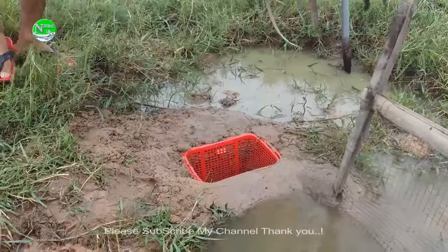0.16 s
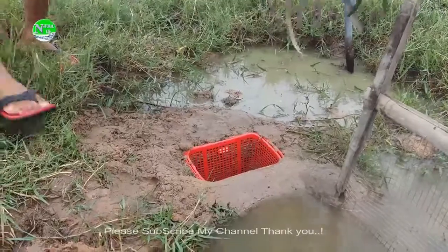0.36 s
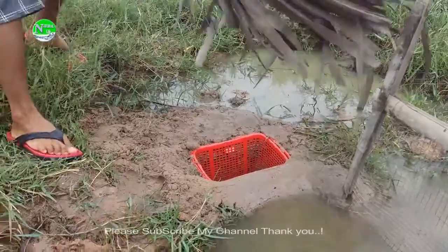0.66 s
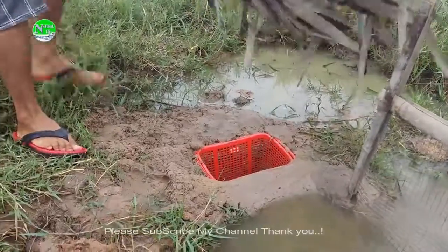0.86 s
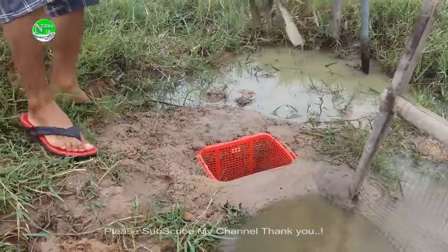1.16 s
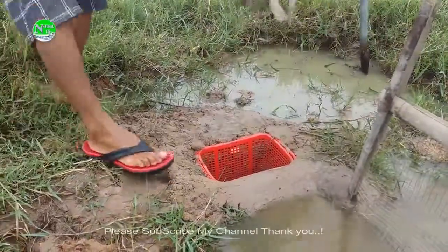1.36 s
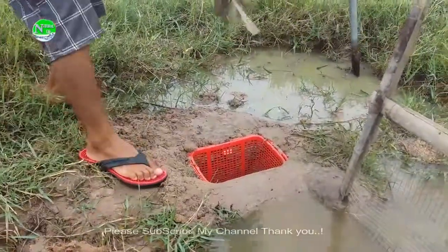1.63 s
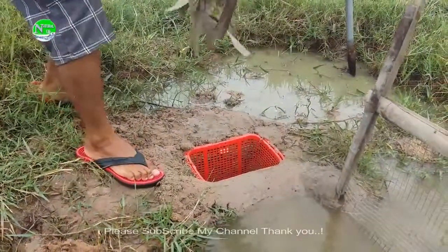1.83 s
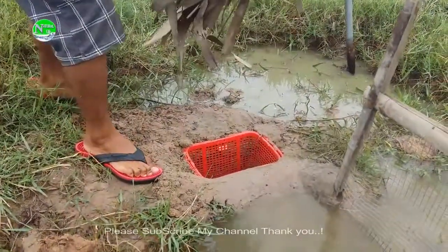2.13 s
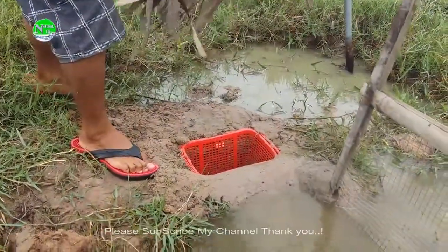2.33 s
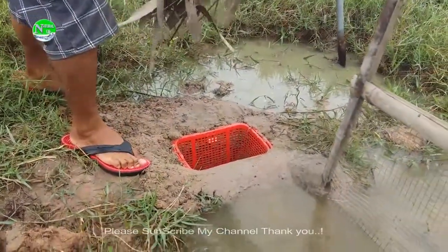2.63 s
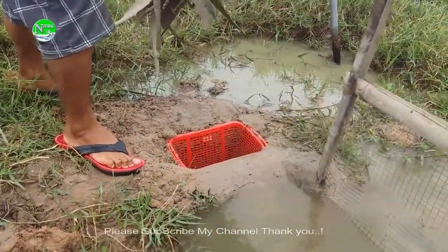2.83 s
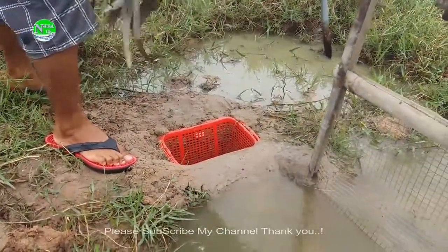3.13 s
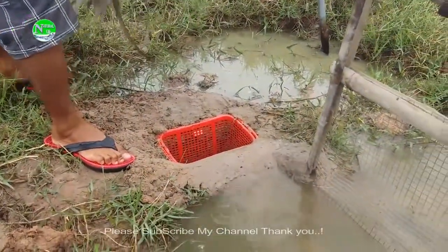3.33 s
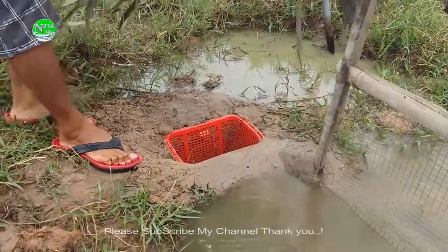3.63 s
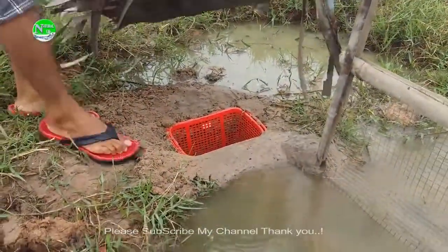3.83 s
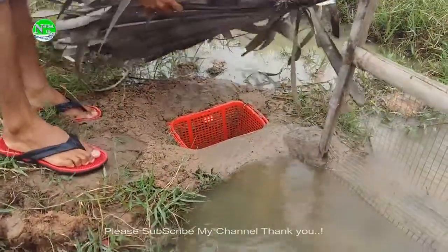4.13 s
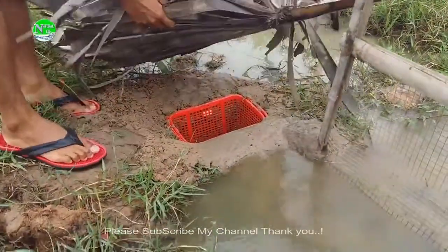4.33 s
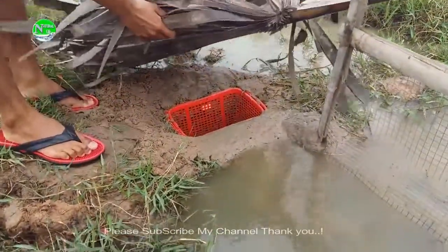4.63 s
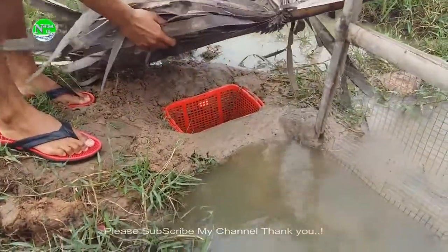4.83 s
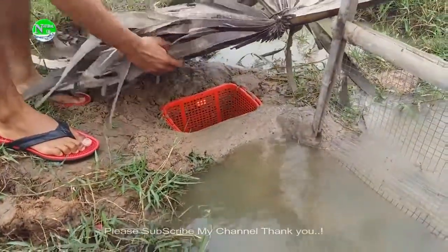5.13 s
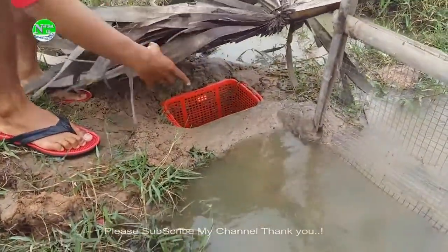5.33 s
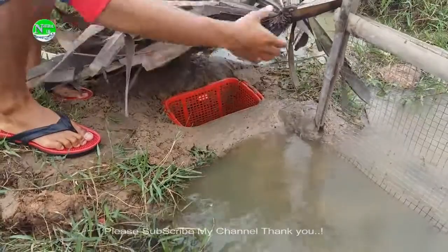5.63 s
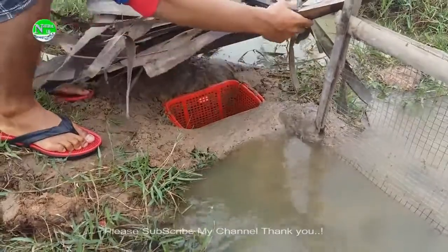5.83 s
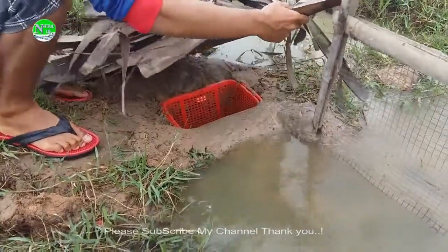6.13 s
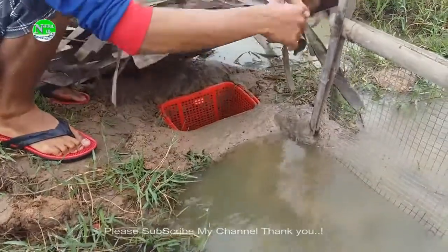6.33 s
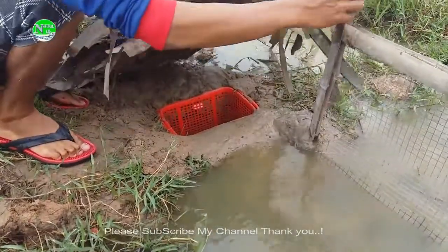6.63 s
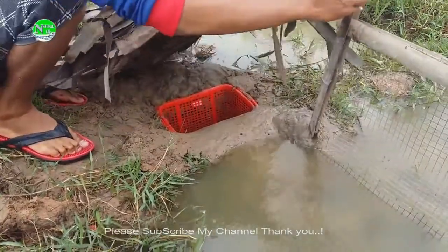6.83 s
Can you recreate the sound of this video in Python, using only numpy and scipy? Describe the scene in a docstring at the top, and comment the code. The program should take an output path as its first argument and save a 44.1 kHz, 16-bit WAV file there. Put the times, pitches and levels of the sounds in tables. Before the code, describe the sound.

A bundle of dead, papery fronds is shaken and set down in open air. It starts with fine crackle and short dragging swishes, builds to loud bright snaps and tearing ribs, and pauses briefly around three seconds before another burst just before four. Then sparser rubbing and isolated cracks remain, with tiny high bird chips and barely audible far buzzes. Close small stereo microphone, bright around six kilohertz, over a faint distant rumble.

```python
"""Dry palm fronds are carried in, shaken and laid down beside a ditch, over low distant rumble.
From the start blades rub (slips ringing modes) and ribs snap (micro-crack flurries, thickest from 2 to 4 s).
A stalk creaks near 1.9 s (noise on three modes); a far bird buzzes from 2.6 s (noise bands).
A small grass bird chips from 4.2 s (gliding sines). Rubbing thins out toward the end.
Two microphone ports a hand apart; crackle and snaps are brightest near 6 kHz, where the ports ring unevenly."""
import sys
import numpy as np
from scipy import signal
from scipy.fft import rfft, irfft
from scipy.io import wavfile

SR = 44100
rng = np.random.default_rng(int(sys.argv[2]) if len(sys.argv) > 2 else 0)


def generate_wav(signal):
    """Clip the signal to [-1, 1] and save it as 16-bit WAV at the path in sys.argv[1]."""
    frames = np.transpose(np.atleast_2d(signal))
    scaled = np.clip(frames, -1, 1) * 32767
    pcm = np.round(scaled).astype(np.int16)
    wavfile.write(sys.argv[1], SR, pcm)


N = 306936

# Slow busyness of the bundle: time_s, crackle_db, swish_re_crackle_db, brittle_re_crackle_db
HANDLING = [(0, -49, -4, -17), (0.34, -53, -1, -14), (0.401, -40.5, -1.5, -21), (0.68, -42.5, 1.5, -20.5),
            (0.74, -46, -5.5, -16.5), (1.14, -43, -2, -17), (1.343, -48.5, -7, -22), (1.363, -38.5, 1, -14),
            (1.75, -42.5, -3.5, -24), (2.0, -37.5, -10.5, -19), (2.58, -39.5, -6.5, -17),
            (2.68, -53.5, -0.5, -18), (2.97, -45.5, -3.5, -21), (3.45, -42, -4, -21.5), (4.0, -40, -6, -15),
            (4.45, -49.5, -4.5, -20.5), (5.2, -49, -1.5, -20), (5.85, -54.5, -3, -21.5),
            (6.96, -54, 0, -19.5)]
# Fronds dragged across each other, one swell each:
# middle_s, length_ms, crackle_db, swish_re_crackle_db
RUBS = [(0.455, 130, -36.5, -1), (0.62, 300, -38, -1.5), (0.83, 410, -44, 0.5), (1.457, 76, -38, 7.5),
        (1.557, 128, -32, -4), (1.645, 126, -35, -5), (1.97, 400, -43, -1), (2.179, 150, -35, -6),
        (2.77, 60, -43.5, -5), (2.882, 100, -29, -8), (3.186, 140, -39, 2.5), (4.549, 133, -41, -3.5),
        (4.788, 93, -53, 6), (5.13, 145, -46, 2.5), (5.349, 160, -44, -7.5), (5.471, 78, -37.5, -7),
        (6.05, 460, -43.5, -5.5), (6.498, 140, -43.5, -8.5), (6.869, 56, -55, 5.5)]
# Bundle position: time_s, left_re_right_db
BUNDLE_PAN = [(0, -2), (0.5, -1), (2.1, -0.9), (3.5, -0.6), (4.0, -0.5), (4.3, -1.2), (5.6, -1),
              (6.96, -2.2)]
# Swish level above SWISH_SPLIT_HZ: time_s, gain_db
SWISH_TOP_GAIN = [(0, -1.5), (0.6, -12.5), (1.75, -3), (2.3, -1.5), (3.3, -2), (5.0, -1.5), (6.96, -4)]
# Rib snaps: start_s, crack_peak_db, tear_scale_ms, blade_body_re_crack_db, rib_pitch_hz
SNAPS = [(0.043, -31.5, 3.4, -1, 3830), (0.1583, -26, 3.2, -15, 6900), (0.36, -35, 6, -20, 5370),
         (0.4053, -24, 9, -15, 5500), (0.588, -22, 5.6, -10, 5540), (1.2234, -27.5, 5.6, -2.5, 4260.0),
         (1.292, -29.5, 6.2, -2, 6500), (1.3487, -24.5, 4.5, 7.5, 2300), (1.403, -22.5, 9, -3.5, 6700),
         (1.449, -27, 5.3, 1, 2120), (1.704, -29.5, 5.9, -5, 5960), (1.953, -21.5, 17, -12, 5260),
         (1.988, -19.5, 7.4, -10, 5700), (2.023, -22, 4.2, -16, 5760), (2.046, -23.5, 6.4, -16, 1800),
         (2.0687, -14, 6.9, -28, 5460), (2.101, -16.5, 11.7, -13.5, 5550), (2.157, -9.5, 14.7, -16.5, 5750),
         (2.28, -28, 9.5, 0, 5740), (2.305, -22, 4.3, -17, 5800), (2.353, -22, 2.3, -14, 2720),
         (2.4367, -11, 3.1, -16.5, 5540), (2.5155, -9, 3, -35, 7000), (2.528, -9, 3.46, -17, 5450),
         (2.582, -18, 5.8, -10, 5830), (2.595, -17, 3, -14, 5860), (2.6293, -22.5, 7.2, -6.5, 4730),
         (2.756, -26, 6.2, -5, 5880), (2.866, -16.5, 12, -6, 5500), (2.9197, -18, 10, -4, 4900),
         (2.9918, -24.5, 2.1, -24, 5560), (3.041, -28, 5.5, -0.5, 2600), (3.256, -30, 14, 0, 5670),
         (3.3715, -22.5, 8.8, -7.5, 5700), (3.3836, -23.5, 7.8, -28, 6000),
         (3.4351, -19.5, 8.1, -6.5, 5160), (3.446, -23.5, 17, -4.5, 4900), (3.542, -31, 4.4, -22, 6050),
         (3.562, -23, 3.9, -20, 5670), (3.697, -17, 4.7, -19, 7000), (3.7285, -12, 2.8, -44, 6450),
         (3.812, -13.5, 2.9, -22, 6770), (3.8303, -12.5, 6.4, -20, 6640), (3.8844, -21.5, 2.4, -34, 6220),
         (3.9013, -27, 1.2, -35, 6480.0), (3.915, -13, 3.7, -29, 6600), (3.9481, -18.5, 6.8, -11.5, 3950),
         (3.9885, -16, 4.1, -16, 7000), (4.0164, -18.5, 3.6, -20, 6600), (4.047, -19.5, 8.3, -12.5, 5850),
         (4.063, -19.5, 3.2, -20, 5100), (4.0731, -20, 3.4, -36, 5900), (5.057, -34.5, 6.9, -1.5, 4150),
         (5.1252, -21, 3.8, -32, 5650), (5.286, -16, 2.8, -27, 6660), (5.6052, -28, 3.8, 0.5, 2660),
         (5.6188, -33, 2, -29, 5930), (5.642, -32.5, 2.2, -28, 5510.0), (5.664, -32, 5.9, -7, 4200),
         (5.947, -18.5, 6.4, -20, 4160), (5.9974, -22, 4.1, -8, 5160), (6.0121, -24, 1.5, -19, 5670),
         (6.083, -27.5, 20, -19, 5660), (6.179, -32.5, 5.8, -14, 4280), (6.4447, -30.5, 8.3, -11, 6650),
         (6.759, -32, 8.3, -28, 3900)]
# Spectrum of fine crackle: freq_hz, density_db_per_hz (relative)
CRACKLE_SPECTRUM = [(1290, -50), (2200, -39.5), (2700, -31.5), (3320, -19.5), (3850, -12), (4960, -7),
                    (5780, -1.5), (6100, -2.5), (9000, -26), (11700, -96)]
# Spectrum of broad blade swish: freq_hz, density_db_per_hz (relative)
SWISH_SPECTRUM = [(180, -23), (300, -7.5), (571, -1), (880, -1), (1350, -0.5), (2220, -1.5), (3200, -2.5),
                  (4160, -3), (7040, -120)]
# Spectrum of the brittle top: freq_hz, density_db_per_hz (relative)
BRITTLE_SPECTRUM = [(4710, -18.5), (8000, -1), (8760, 7.5), (10500, 2), (12500, -8), (16200, -14)]
# Bird chips: start_s, level_db, top_pitch_hz
CHIPS = [(4.21, -27.5, 8070), (4.5977, -27, 8050), (4.9008, -28, 7900), (5.435, -31, 7880),
         (5.667, -31, 7950), (6.2655, -30.5, 7530), (6.507, -32, 7530)]
# Far buzzes: start_s, end_s, centre_hz, level_db
BUZZES = [(2.648, 2.803, 7500, -61), (3.326, 3.377, 7350, -44), (4.72, 4.85, 7950, -58),
          (4.99, 5.12, 8000, -58), (5.29, 5.45, 8000, -59), (5.596, 5.76, 7750, -58),
          (6.62, 6.746, 7550, -63), (6.86, 6.957, 7700, -67)]
# Spectrum of the rumble: freq_hz, density_db_per_hz (relative)
RUMBLE_SPECTRUM = [(15, -29), (36, -37), (49, -2.5), (97, 0), (124, 1), (200, -4.5), (242, -9.5),
                   (500, -26.5), (650, -72)]

SWISH_SPLIT_HZ = 2830
PORT_LAG_SAMPLES = 15  # largest lag between the ports
RIB_RE_CRACK_DB, RIB_CYCLES = -3, 12.0
CREAK_START_S, CREAK_END_S, CREAK_DB = 1.87, 1.99, -45
CREAK_MODES_HZ = (1470, 1850, 2420)
TICK_MS, TICK_GAP_MS, TICK_DB = 3.6, 5.7, -3  # gap is onset to onset
NOTE_AT_MS, NOTE_MS, DIP_AT_MS, DIP_MS = 21.6, 10.5, 3.3, 1.3  # dip is timed from the note
LOW_PITCH_RATIO = 0.77  # glide depth scale, re top pitch
RUMBLE_DB = -47
PORT_RING_HZ, PORT_UNEVEN_RATIO = 5940, 0.15
CUTOFF_HZ = 16450
OPPOSITE = np.array([[1], [-1]])  # left, right


def rustle():
    """Jerks of the hand bunch the slips of all blades into crackle, brittle top and swish."""
    t_s = np.arange(N) / SR
    crackle_db, swish_db, brittle_db = handling()
    pan = from_db(np.interp(t_s, *np.transpose(BUNDLE_PAN)) * OPPOSITE / 2)
    jerks = drift(25.0) + 0.45 * drift(44)
    jerks = jerks * np.interp(crackle_db, [-52, -37], [1.25, 0.6])  # hard rubbing runs on evenly

    fine = blades(2300, 14000, 1200, spread_db=2.6, cycles=24.0, own_db=2.8)
    broad = blades(350, 4200, 600, spread_db=2.0, cycles=28.0, own_db=2.7)
    crackle = rms_one(colour(fine * from_db(1.9 * jerks), CRACKLE_SPECTRUM))
    brittle = rms_one(colour(fine * from_db(0.76 * jerks), BRITTLE_SPECTRUM))
    swish = rms_one(colour(broad * from_db(1.4 * jerks), SWISH_SPECTRUM))

    low_sos = signal.butter(4, SWISH_SPLIT_HZ, "low", fs=SR, output="sos")
    high_sos = signal.butter(4, SWISH_SPLIT_HZ, "high", fs=SR, output="sos")
    top_gain = from_db(np.interp(t_s, *np.transpose(SWISH_TOP_GAIN)))
    swish = signal.sosfilt(low_sos, swish) + top_gain * signal.sosfilt(high_sos, swish)
    return (pan * from_db(crackle_db) * crackle
            + from_db(brittle_db) * brittle
            + pan * from_db(swish_db) * swish)


def handling():
    """Crackle, swish and brittle levels in dB: power of the slow busyness plus the rub swells."""
    t_s = np.arange(N) / SR
    time_s, crackle_db, swish_db, brittle_db = np.transpose(HANDLING)
    slow_db = [np.interp(t_s, time_s, crackle_db), np.interp(t_s, time_s, crackle_db + swish_db)]
    power = from_db(2 * np.array(slow_db))
    for middle_s, length_ms, rub_db, rub_swish_db in RUBS:
        phase = np.clip((t_s - middle_s) * 1000 / length_ms, -0.5, 0.5)
        swell = np.cos(np.pi * phase) ** 2
        power += from_db(2 * np.array([[rub_db], [rub_db + rub_swish_db]])) * swell ** 2
    crackle, swish = 10 * np.log10(power)
    return crackle, swish, crackle + np.interp(t_s, time_s, brittle_db)


def blades(low_hz, high_hz, per_s, spread_db, cycles, own_db, count=22):
    """Each pitch has its own fits of tiny slips, ringing a few cycles from all over the bundle."""
    out = 0
    for hz in np.geomspace(low_hz, high_hz, count):
        at = np.flatnonzero(rng.random(N - 64) < per_s / SR) + 32
        size = rng.exponential(1, len(at))
        sign = rng.standard_normal(len(at))  # random polarity and strength
        side = rng.uniform(-1, 1, len(at)) ** 3
        slips = from_db(spread_db * np.minimum(size, 5) + own_db * drift(25)[at]) * sign
        lag = np.round(PORT_LAG_SAMPLES / 2 * side).astype(int)
        ports = np.zeros((2, N))
        ports[0, at + lag] = slips * from_db(2.0 * side)
        ports[1, at - lag - (side < 0)] = slips * from_db(-2.0 * side)
        out = out + resonate(ports, hz, cycles) + 0.11 * ports
    return rms_one(out)


def snaps():
    """A tearing rib's micro-cracks ring rib and blade; the first break is alike at both ports."""
    size = 2048
    out = np.zeros((2, N + 4096))
    crisp, brittle = response(CRACKLE_SPECTRUM), response(BRITTLE_SPECTRUM)
    # a small piece has little bass
    body = signal.lfilter([1, -1], [1, -0.93], response(SWISH_SPECTRUM))
    draws = rng.standard_normal((len(SNAPS), 4, size))
    ms = np.arange(size) / SR * 1000
    for (start_s, crack_db, tear_ms, body_db, rib_hz), (mid, side, gate, chance) in zip(SNAPS, draws):
        tear = np.sin(np.pi * np.clip((ms + 0.9) / (1.36 * tear_ms + 0.3), 0, 1)) ** 0.7
        tear = tear * from_db(-7.0 * ms / tear_ms)
        rattle = from_db(-11 - 1.4 * ms)  # loose fibres
        cracks = (mid + 0.92 * side * OPPOSITE) * (0.5 + (gate > 1.1)) * (tear + rattle)
        cracks[:, 4] += 95 / tear_ms ** 2  # a short tear is one clean break

        bright = crisp + from_db(-23 + 1.5 * chance[2]) * brittle
        top = signal.oaconvolve(cracks, bright[None], axes=1)
        rib = resonate(resonate(cracks, rib_hz, RIB_CYCLES), rib_hz, RIB_CYCLES)
        top = top[:, :size] / abs(top).max() + from_db(RIB_RE_CRACK_DB) * rib / abs(rib).max()

        low = signal.oaconvolve(cracks.mean(0) + 0.94 * cracks, body[None], axes=1)[:, :size]
        blade_hz = 1800 * 1.25 ** np.clip(chance[0], -2, 2)
        low = low + 0.7 * resonate(low, blade_hz, 20.0)

        snap = top / abs(top.mean(0)).max() + from_db(body_db) * low / abs(low.mean(0)).max()
        pan_db = np.interp(start_s, *np.transpose(BUNDLE_PAN)) + 0.5 * chance[1]
        at = round(start_s * SR)
        out[:, at:at + snap.shape[1]] += from_db(crack_db + pan_db * OPPOSITE / 2) * snap
    return out[:, :N]


def creak():
    """Uneven friction keeps the bending stalk's modes faintly ringing."""
    middle_s, length_s = (CREAK_START_S + CREAK_END_S) / 2, CREAK_END_S - CREAK_START_S
    bending = abs(np.arange(N) / SR - middle_s) < length_s / 2
    friction = rng.standard_normal(N) * bending
    modes = sum(resonate(friction, hz, 45.0) for hz in CREAK_MODES_HZ)
    return from_db(CREAK_DB) * modes / modes[friction != 0].std()


def bird():
    """Each chip is the same gliding whistle, with a faint echo off the bank."""
    out = np.zeros(N)
    for start_s, level_db, top_hz in CHIPS:
        call = from_db(level_db) * whistle(top_hz)
        at = round(start_s * SR)
        out[at:at + len(call)] += call
    out += from_db(-17) * np.roll(out, round(0.006 * SR))
    return place(out, -2.1, 2)


def whistle(top_hz):
    """A sine gliding through two rising ticks, a pause, and a note that dips and climbs back."""
    ms = np.arange(round((NOTE_AT_MS + NOTE_MS) * SR / 1000)) / SR * 1000
    tick = np.clip(ms % TICK_GAP_MS / TICK_MS, 0, 1)
    note = np.clip((ms - NOTE_AT_MS) / NOTE_MS, 0, 1)
    ticking = ms < 2 * TICK_GAP_MS
    dip = 0.283 * (1 - note) + 0.85 * np.exp(-((ms - NOTE_AT_MS - DIP_AT_MS) / DIP_MS) ** 2)
    pitch = 1 - (1 - LOW_PITCH_RATIO) * np.where(ticking, (1 - tick) ** 3, dip)
    tick_level = from_db(TICK_DB) * np.sin(np.pi * tick ** 0.69)
    note_level = (0.72 + 0.56 * dip) * abs(np.sin(np.pi * note ** 0.6)) ** 0.5
    level = np.where(ticking, tick_level, note_level)
    return level * np.sin(2 * np.pi * np.cumsum(top_hz * pitch) / SR)


def buzz():
    """A far trill blurred to flickering band noise: quick swells that stop short, over a faint trace."""
    t_s, out = np.arange(N) / SR, 0
    mid, side = rng.standard_normal((2, N)) * from_db(0.91 * drift(120))
    noise = mid + side * OPPOSITE
    for start_s, end_s, hz, level_db in BUZZES:
        sos = signal.butter(2, [hz - 350, hz + 350], "band", fs=SR, output="sos")
        band = rms_one(signal.sosfilt(sos, noise))
        corners_s = [start_s, start_s + 0.013, end_s - 0.008, end_s]
        out = out + from_db(level_db) * band * np.interp(t_s, corners_s, [0.056, 1.0, 1, 0.012])
    return out


def rumble():
    """Distant low noise, nearly the same at both ports, drifting slightly in level."""
    noise = rng.standard_normal((2, N + 8192))
    mid, side = rms_one(colour(noise, RUMBLE_SPECTRUM, size=8192)[:, 8192:])
    return from_db(RUMBLE_DB + 0.13 * drift(1.0)) * (mid + from_db(-15.5) * side * OPPOSITE)


def resonate(x, hz, cycles):
    """A mode that dies by 60 dB in the given number of cycles; gain 1 at its peak."""
    r = from_db(-60 * hz / (cycles * SR))
    numerator = [1 - r * r, 0, r * r - 1]
    denominator = [2, -4 * r * np.cos(2 * np.pi * hz / SR), 2 * r * r]
    return signal.lfilter(numerator, denominator, x + 1e-18)


def response(spectrum, size=2048):
    """Causal (minimum-phase) impulse response of a spectrum, energy 1."""
    hz, db = np.transpose(spectrum)
    grid_hz = np.arange(size + 1) * SR / 2 / size
    log_gain = np.interp(np.log(grid_hz + 1), np.log(hz), db) * np.log(10) / 20
    cepstrum = irfft(log_gain)
    cepstrum[1:size] *= 2  # fold onto positive time
    cepstrum[size + 1:] = 0
    return rms_one(irfft(np.exp(rfft(cepstrum)))[:size]) / np.sqrt(size)


def colour(x, spectrum, size=2048):
    """Filter both ports to a spectrum."""
    return signal.oaconvolve(x, response(spectrum, size=size)[None], axes=1)[:, :x.shape[1]]


def place(x, pan_db, lag_samples):
    """Both ports hear x; a positive lag delays the left, a negative one the right."""
    lag = int(round(lag_samples))
    left = np.roll(x, max(lag, 0)) * from_db(pan_db / 2)
    right = np.roll(x, max(-lag, 0)) * from_db(-pan_db / 2)
    return np.array([left, right])


def drift(rate_hz):
    """Slow random wander, RMS 1: noise through two equal one-pole low-passes."""
    r = np.exp(-2 * np.pi * rate_hz / SR)
    return rms_one(signal.lfilter([1], [1, -2 * r, r * r], rng.standard_normal(N + SR))[SR:])


def rms_one(x):
    """Scale to RMS 1."""
    return x / np.sqrt(np.mean(x ** 2) + 1e-20)


def from_db(db):
    """Amplitude ratio of a level in dB."""
    return 10 ** (np.asarray(db) / 20)


def scene():
    """Sum of all sources at the two ports."""
    return rustle() + snaps() + creak() + bird() + buzz() + rumble()


def record(dry):
    """The right port rings more than the left; the deepest bass and the top are cut."""
    dry = dry - PORT_UNEVEN_RATIO * resonate(dry, PORT_RING_HZ, 7.2) * OPPOSITE
    dry = signal.sosfilt(signal.butter(2, 40, "high", fs=SR, output="sos"), dry)
    return signal.sosfilt(signal.cheby2(14, 60, CUTOFF_HZ, fs=SR, output="sos"), dry)


dry = scene()
out = record(dry)
generate_wav(out)
```